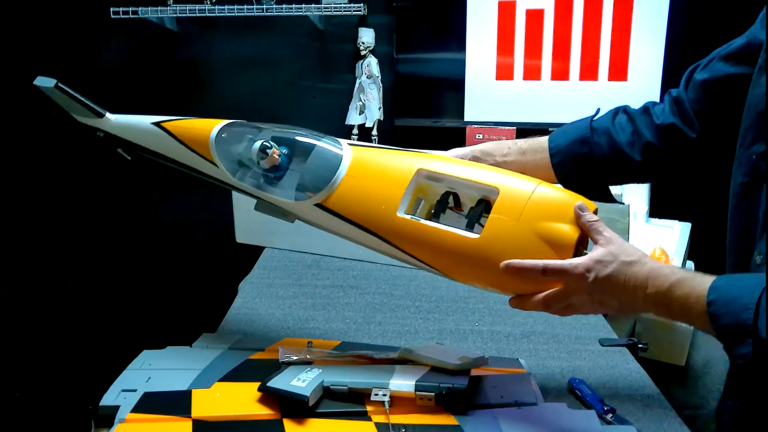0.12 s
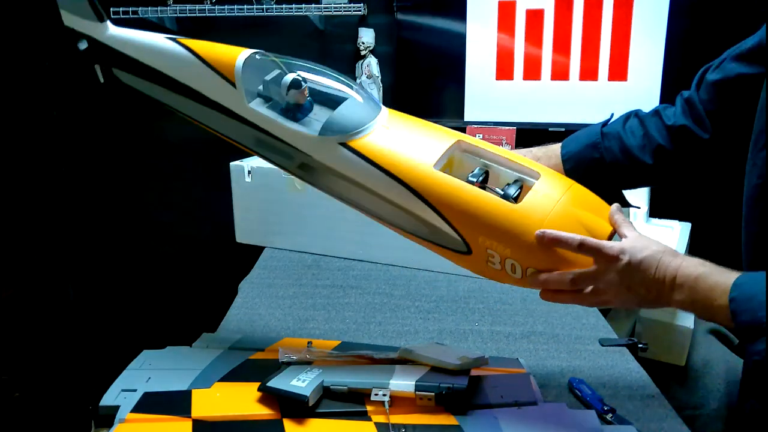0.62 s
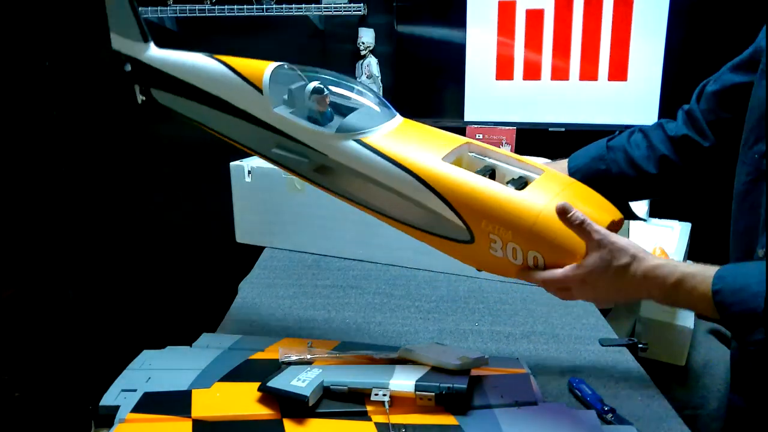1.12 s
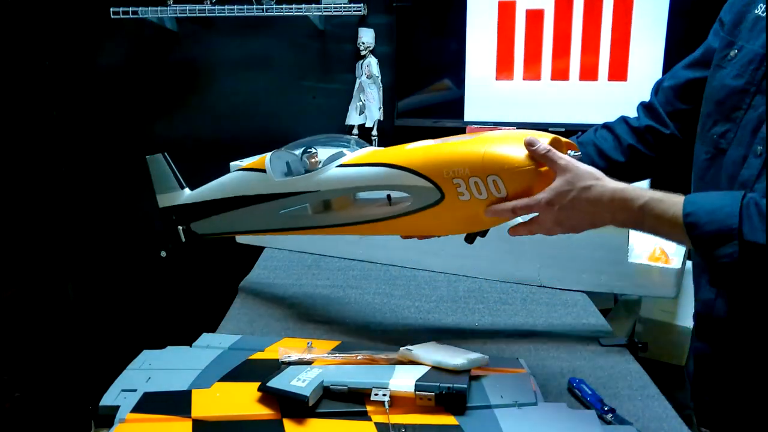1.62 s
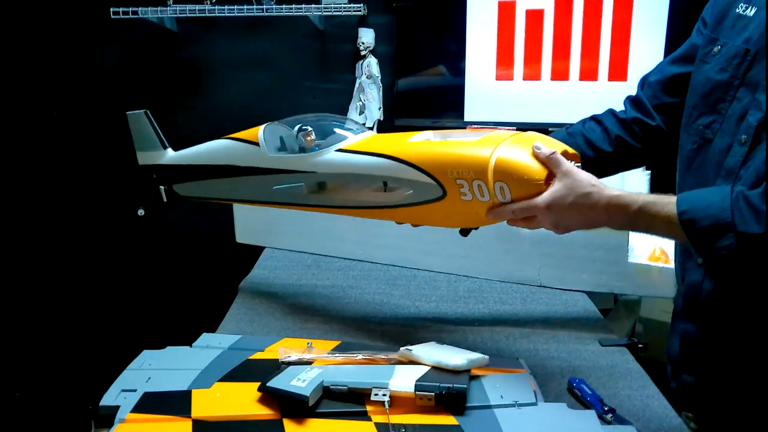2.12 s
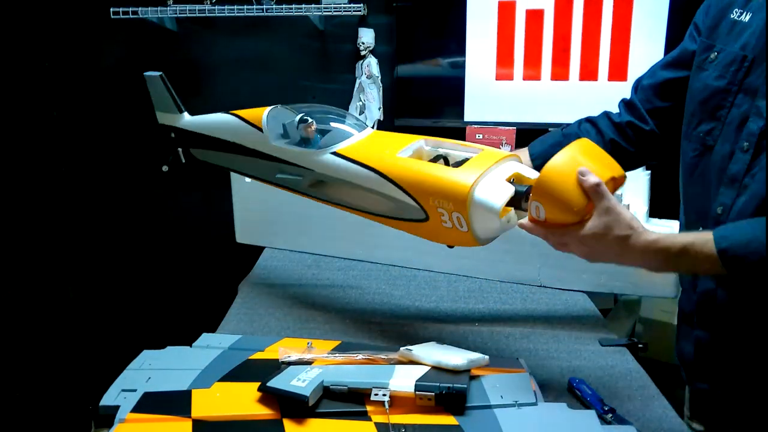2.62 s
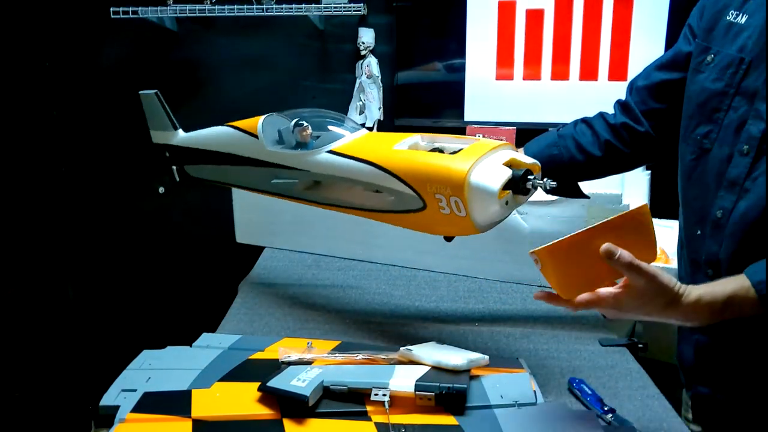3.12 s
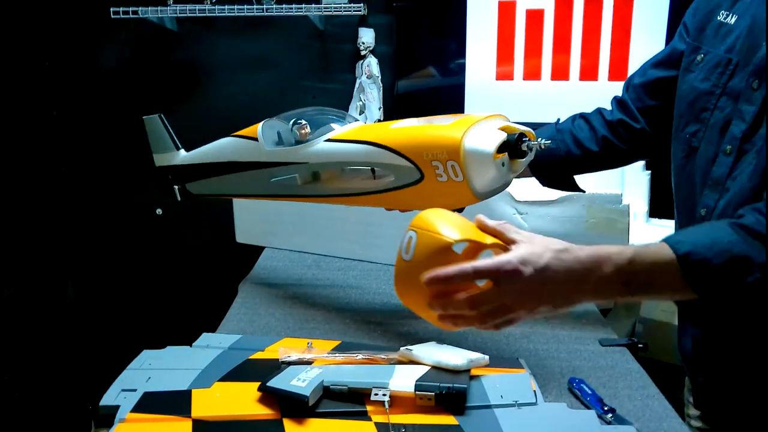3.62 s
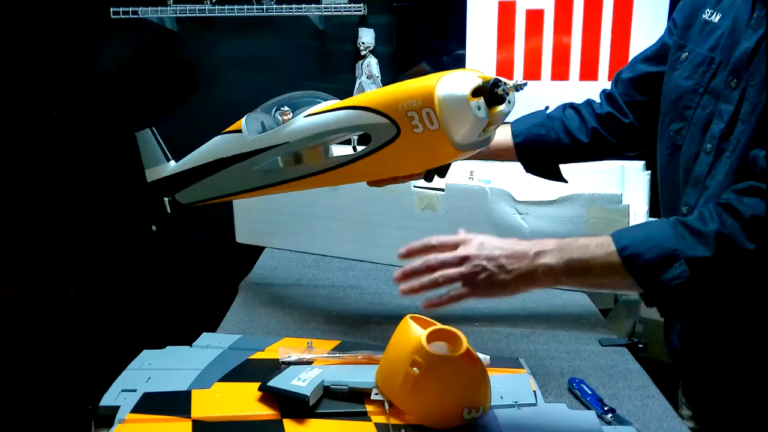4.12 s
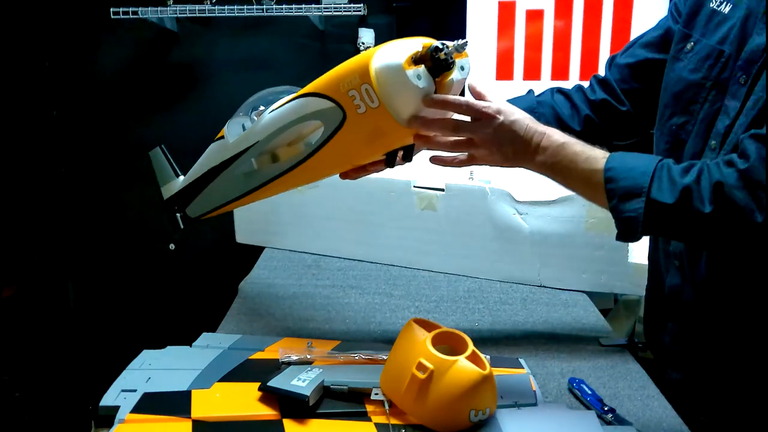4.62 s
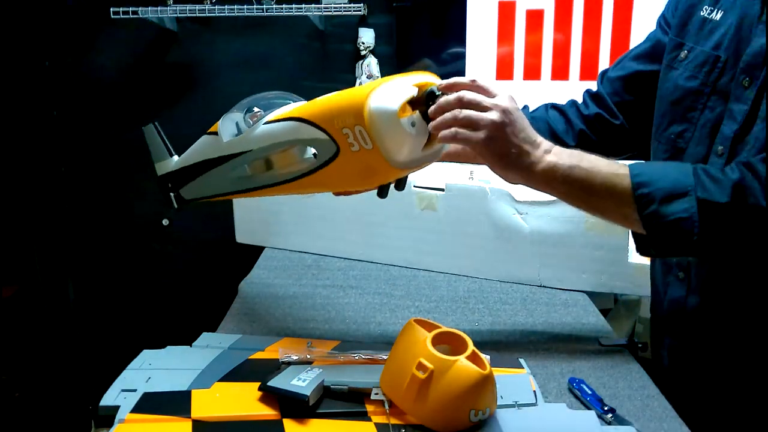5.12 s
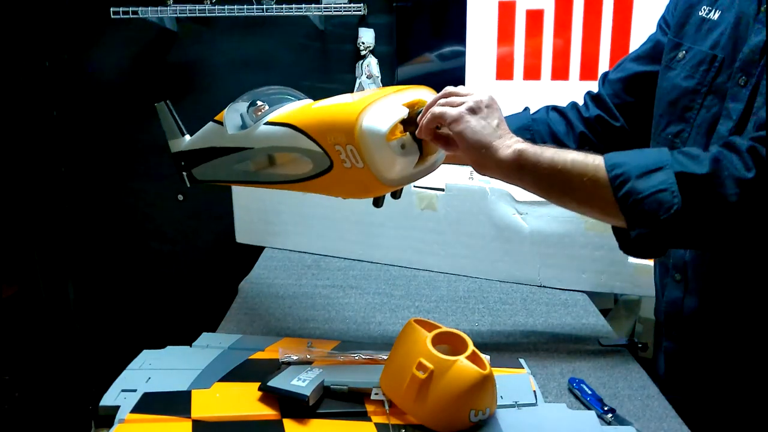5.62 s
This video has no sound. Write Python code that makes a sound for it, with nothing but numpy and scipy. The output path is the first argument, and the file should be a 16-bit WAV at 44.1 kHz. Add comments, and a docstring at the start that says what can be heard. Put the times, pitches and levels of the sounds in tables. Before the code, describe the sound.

Soft rubs and dry plastic snaps in a small room, then one loud hollow knock on a table, with small clatters and faint squeaks.

```python
"""Hands on a foam model airplane

Hands turn a foam model airplane, pull off its plastic nose cowl and set it down on a table.
Snaps, knocks, scuffs and squeaks are short blows and rubs that ring the plastic and the hollow foam body.
Skin and sleeves rub as shaped noise; a low rumble of noise swells while the plane is moved.
Mains hum (steady sines) and hiss lie under it; a small room echoes the taps and rubs."""
import sys
import numpy as np
from scipy import signal
from scipy.fft import rfft, irfft
from scipy.io import wavfile
from scipy.ndimage import uniform_filter1d

SR = 44100
rng = np.random.default_rng(int(sys.argv[2]) if len(sys.argv) > 2 else 0)


def ratio(d):
    """dB to gain"""
    e = np.asarray(d, float) / 20
    return 10 ** e


def digitize_waveform(pressure):
    """Quantize a signal to 16-bit integers and store it at the path in sys.argv[1].

    Rows of a 2-D input are taken as channels; values are limited to [-1, 1].
    """
    field = np.atleast_2d(pressure).T
    bounded = np.clip(field, -1, 1)
    quanta = np.round(bounded * 32767).astype(np.int16)
    wavfile.write(sys.argv[1], SR, quanta)


N = 253734
TIME = np.arange(N) / SR  # s, whole scene
TAP_TIME = np.arange(round(SR / 8)) / SR  # s, one tap
SWING = 1 - np.exp(-TAP_TIME / 0.0012)  # soft start of a low ring


def evened(x):
    """Scales to rms 1."""
    return x / np.sqrt(np.mean(x ** 2) + 1e-20)


def read(points, hz):
    """Reads a curve between its points on a log-frequency axis."""
    f, value = np.transpose(points)
    return np.interp(np.log(hz + 1), np.log(f + 1), value)


def coloured(x, colour):
    """Filters x to the given spectrum, at rms 1."""
    hz = np.fft.rfftfreq(N, 1 / SR)
    return evened(irfft(rfft(x) * ratio(read(colour, hz)), N))


def lumps(seconds):
    """Slow random wander of rms 1: noise averaged twice over this many seconds."""
    size = max(round(seconds * SR), 2)
    once = uniform_filter1d(rng.standard_normal(N), size)
    return evened(uniform_filter1d(once, size))


# how busily the plane is moved: (time [s], level over rest [dB])
BUSY = [(0.1, -1.5), (0.79, 3.5), (0.86, 8.5), (1.55, 13.5), (2.25, 14.5), (2.65, 12), (3.5, 6.5),
        (4.2, 10), (5.6, 5)]


def busy_db():
    """The handling curve at every sample, drawn straight from point to point."""
    return np.interp(TIME, *np.transpose(BUSY))


# steady mains tones: (frequency [Hz], rms level [dB])
HUM = [(60, -49.5), (120, -58), (180, -56.5), (240, -68), (300, -67.5), (360, -69), (420, -68)]


def hum():
    """Mains hum: steady sine tones, each starting at a random point of its cycle."""
    tones = np.zeros(N)
    for hz, db in HUM:
        tones += np.sqrt(2) * ratio(db) * np.sin(2 * np.pi * (hz * TIME + rng.random()))
    return tones


# colour of the hiss: (frequency [Hz], relative level per Hz [dB])
HISS_COLOUR = [(41, -21), (70, -14.5), (183, -6), (205, -8), (425, -18.5), (455, -14), (546, -13.5),
               (1750, -28), (7360, -43), (16400, -42.5)]


def hiss():
    """Broad noise whose level wanders slightly around -53.5 dB."""
    level_db = -53.5 + 0.87 * lumps(0.23)
    return ratio(level_db) * coloured(rng.standard_normal(N), HISS_COLOUR)


# colour of the low shaking: (frequency [Hz], relative level per Hz [dB])
RUMBLE_COLOUR = [(12, -9), (25, 2), (40, 9), (80, 1), (110, -3.5), (170, -11.5), (300, -66)]


def rumble():
    """Lumpy low shaking that reaches the microphone: low noise that follows the handling."""
    level_db = -54.5 + busy_db() + 1.8 * lumps(0.07)
    return ratio(level_db) * coloured(rng.standard_normal(N), RUMBLE_COLOUR)


# colours of the bright and the dull friction: (frequency [Hz], relative level per Hz [dB])
RUB_BRIGHT = [(700, -26), (1500, -30), (2420, -5.5), (3690, -9), (10000, -12), (15100, -19), (16400, -64)]
RUB_DULL = [(150, -45), (250, 0), (533, -6.5), (784, -3.5), (1350, -10.5), (2740, -17), (6000, -23),
            (7800, -25), (13200, -120)]
# airy swishes of skin and cloth: (middle [s], length [s], level of the bright part before it wavers [dB])
SWISHES = [(0.006, 0.082, -63.5), (0.878, 0.087, -58.5), (1.555, 0.12, -68), (1.755, 0.11, -63.5),
           (2.262, 0.2, -51.5), (2.463, 0.15, -60), (2.814, 0.091, -53.5), (2.953, 0.13, -64),
           (3.221, 0.12, -56.5), (4.223, 0.17, -59.5), (4.523, 0.061, -56.5), (4.632, 0.1, -65),
           (4.868, 0.044, -62.5), (5.205, 0.021, -72)]


def rubbing():
    """Dense grains of friction, bright and dull, follow the handling and swell in single swishes."""
    grain_db = 2.0 * np.minimum(rng.exponential(1, (2, N)), 5)
    grains = rng.standard_normal((2, N)) * ratio(grain_db)
    swish = np.zeros(N)
    for middle, length, db in SWISHES:
        swish += ratio(db) * np.exp(-np.abs(2 * (TIME - middle) / length) ** 2.5)  # smooth swell
    swish *= ratio(2.2 * lumps(0.021))  # pressure wavers
    # each dB of busyness adds 0.64 dB of bright rubbing and 0.92 dB of dull
    bright = ratio(-74 + 0.64 * busy_db()) + swish
    dull = ratio(-69.5 + 0.92 * busy_db()) + ratio(-7.5) * swish
    bright *= ratio(1.5 * lumps(0.006))
    dull *= ratio(3.6 * lumps(0.0067))
    return coloured(grains[0], RUB_BRIGHT) * bright + coloured(grains[1], RUB_DULL) * dull


def ring(modes, t):
    """Adds dying sine tones, as a struck body rings; each call tunes them a little apart."""
    tune = 1 + 0.03 * rng.standard_normal(len(modes))
    total = np.zeros(len(t))
    for (hz, t60, db), k in zip(modes, tune):
        total += ratio(db - 60 * t / t60) * np.sin(2 * np.pi * hz * k * t)
    return total


def excite(drive, body):
    """Lets a blow or a rub set a body ringing."""
    return signal.fftconvolve(drive, body)[:len(drive)]


def add(mix, s, db, sound):
    """Lays a sound into the mix at time s, scaled to this peak level."""
    part = mix[round(s * SR):][:len(sound)]
    part += ratio(db) * sound[:len(part)] / np.abs(sound).max()


def crack(x):
    """The wide treble of a contact, which escapes without ringing."""
    return signal.lfilter(*signal.butter(2, (1830, 10000), "band", fs=SR), x)


# ring of the thin plastic, before detuning: (frequency [Hz], time to fall 60 dB [s], relative level [dB])
PLASTIC = [(1890, 0.0023, -1), (2510, 0.0042, 0), (3140, 0.0028, 2), (4520, 0.0026, -2)]


def plastic():
    """Ring of the thin plastic: a few high tones that die in milliseconds."""
    return ring(PLASTIC, TAP_TIME)


# low thud of the body, before detuning: (frequency [Hz], time to fall 60 dB [s], relative level [dB])
THUD = [(250, 0.017, 5), (259, 0.068, -4), (336.4, 0.088, 0), (408, 0.18, -15.5)]


def thud():
    """Low thud: longer, deeper tones with a soft start."""
    return ring(THUD, TAP_TIME) * SWING


# ring of the foam body, before detuning: (frequency [Hz], time to fall 60 dB [s], relative level [dB])
FOAM = [(674, 0.0018, 17.5), (1020, 0.0023, -2), (1230, 0.021, 1)]
# gritty scuffs of foam: (time [s], level [dB], crack over the scuff [dB], low thud over the scuff [dB])
SCUFFS = [(0.22, -53.5, 7, -5), (0.624, -45.5, -12, -10), (0.876, -34.5, -6, 0), (.96, -43.5, -18, -22),
          (1.062, -44.5, -17, -23), (1.139, -35.5, -4, 2.5), (1.269, -45.5, -7, -14),
          (1.330, -43.5, 0.5, -18), (1.378, -31, -9, -1.5), (1.606, -37, -5.5, 3.5),
          (1.854, -35.5, -2.5, -3), (2.069, -33.5, 1.5, -15), (2.138, -28.5, -8, -7.5),
          (2.252, -32, -2, 0.5), (2.586, -36.5, -13, -2), (3.04, -41.5, -5, -11), (3.724, -46, -10, -10),
          (3.973, -19, -3.5, -3.5), (3.998, -19, -8, -8.5)]


def scuffs(mix):
    """Gritty, fading noise presses on the plastic and the foam, with a crack and a thud."""
    press = SWING * np.exp(-TAP_TIME / 0.035)
    for s, db, crack_db, thud_db in SCUFFS:
        grit_db = 2.58 * rng.exponential(1, len(TAP_TIME)).clip(0, 4)
        grit = press * rng.standard_normal((3, len(TAP_TIME))) * ratio(grit_db)
        add(mix, s, db, excite(grit[0], plastic()))
        add(mix, s, db - 3.5, excite(grit[1], ring(FOAM, TAP_TIME)))
        add(mix, s, db + crack_db, crack(grit[2]))
        add(mix, s + 0.00508, db + thud_db, thud())  # the thud lags a little


def contact(mix, s, plastic_db, hollow_db, hollow_hz, crack_db):
    """A hard contact rings the plastic and the hollow; a wide crack escapes at once."""
    blow = 0.085 * rng.standard_normal((2, len(TAP_TIME))) * np.exp(-TAP_TIME / 0.0042)  # loose parts rattle on
    blow[:, 0] = 1  # first contact
    blow[:, round(SR * rng.uniform(0.0006, 0.0016))] -= 0.3  # rebound
    shell = plastic() * (1 - np.exp(-TAP_TIME / 0.0003))
    add(mix, s, plastic_db, excite(blow[0], shell))
    modes = [(hollow_hz, 0.011, 0), (1.4 * hollow_hz, 0.008, -6), (0.656 * hollow_hz, 0.014, -8)]
    hollow = ring(modes, TAP_TIME) * (1 - np.exp(-TAP_TIME / 0.00135))  # swings up over a cycle
    add(mix, s, hollow_db, hollow)
    add(mix, s, crack_db, crack(blow[1]))


# hollow knocks: (time [s], level [dB], pitch before detuning [Hz], hard contact over the knock [dB])
KNOCKS = [(0.2683, -36.5, 875, -24), (0.2933, -31.5, 720, -30), (0.7988, -40.5, 600, -5),
          (3.9929, -1, 1096, 0), (3.9968, -11.5, 690, -21), (4.0232, -19, 670, 2.5),
          (4.1981, -17, 617, -13), (4.2403, -28, 514, 0), (4.2577, -31.5, 668, 3)]


def knocks(mix):
    """A contact whose hollow ring has its own pitch, over a faint low thud."""
    for s, db, hz, hard_db in KNOCKS:
        contact(mix, s, db + hard_db, db, hz, db + hard_db - 3)
        add(mix, s, db - 23.5, thud())


# dry snaps of thin plastic: (time [s], crack level [dB], ring of the plastic over the crack [dB])
SNAPS = [(0.4935, -32.5, -8), (0.5501, -30, -7.5), (1.06, -23.5, -10), (1.377, -29, 4), (1.4676, -30, -1),
         (2.076, -19.5, 2.5), (2.1233, -15, -2), (2.134, -14, -2.5), (2.2487, -25, 7.5), (4.075, -25, -15),
         (4.2436, -31, 4.5), (4.3072, -36.5, 5.5), (5.6491, -28.5, -2.5)]


def snaps(mix):
    """A sharp crack and plastic ring; the shell answers every snap faintly near 980 Hz."""
    for s, db, ring_db in SNAPS:
        contact(mix, s, db + ring_db, db - 12, 980, db)


# short squeaky rubs: (time [s], level [dB], pitch before detuning [Hz])
SQUEAKS = [(1.706, -40.5, 2970), (1.7596, -42, 2930), (5.264, -44.5, 2240), (5.298, -40.5, 2400),
           (5.338, -41.5, 2000), (5.3565, -37.5, 2360), (5.37, -44.5, 3000), (5.4336, -47, 2200),
           (5.4622, -48.5, 2190), (5.532, -44, 2960)]


def squeaks(mix):
    """Fading noise of tiny slips excites a few high tones."""
    for s, db, hz in SQUEAKS:
        slips = rng.standard_normal(len(TAP_TIME)) * np.exp(-TAP_TIME / 0.0099)
        tones = ring([(hz, 0.006, 0), (1.3 * hz, 0.004, -4), (5050, 0.006, -13)], TAP_TIME)
        tones *= 1 - np.exp(-TAP_TIME / 0.0004)
        add(mix, s, db, excite(slips, tones))


def taps():
    """All scuffs, knocks, snaps and squeaks; such small bodies give no bass."""
    mix = np.zeros(N)
    scuffs(mix)
    knocks(mix)
    snaps(mix)
    squeaks(mix)
    return signal.sosfilt(signal.butter(4, 210, "high", fs=SR, output="sos"), mix)


# how fast the echoes die: (frequency [Hz], time to fall 60 dB [s])
ROOM = [(200, 0.3), (1000, 0.2), (4000, 0.2), (16000, 0.19)]


def room(x):
    """Sparse echoes dying by band; three tails take turns so that like taps do not echo alike."""
    first, gap, length = 160, 20, SR // 2  # samples
    echoes = np.zeros((3, length))
    starts = np.arange(first, length - gap, gap)
    at = starts + rng.integers(0, gap, (3, len(starts)))  # one echo at random in each gap
    np.put_along_axis(echoes, at, rng.choice([-1., 1.], at.shape), 1)
    hz, t, z = signal.stft(echoes, SR, nperseg=256)
    fade = ratio(-60 * t / read(ROOM, hz)[:, None])
    tails = signal.istft(z * fade, SR, nperseg=256)[1]
    tails[:, :first] = 0  # silence before the first echo
    turn = 2 * np.pi * (3 * TIME + np.arange(3)[:, None] / 6)
    shares = np.sqrt(2 / 3) * np.abs(np.cos(turn))  # squares add to 1
    wet = signal.oaconvolve(x * shares, tails / np.linalg.norm(tails[0]), axes=1)
    return wet[:, :N].sum(0)


def scene():
    """Hands and parts in the room, over the rumble, hum and hiss."""
    near = taps() + rubbing()
    mix = near + ratio(-6.5) * room(near) + rumble() + hum() + hiss()
    return mix[None]


def band_limit(x):
    """A steep low-pass at the top of the band."""
    return signal.sosfilt(signal.butter(12, 16520, fs=SR, output="sos"), x)


def record(dry):
    """The recorder's constant offset, a hard ceiling and floor, then a low-pass near 15.9 kHz."""
    limited = np.clip(dry + 0.027, -0.9, 0.98)
    low_pass = signal.firwin(255, 15900, window=("kaiser", 9), fs=SR)[None]
    finished = signal.oaconvolve(limited, low_pass, "same")
    return band_limit(finished)


dry = scene()
out = record(dry)
digitize_waveform(out)
```